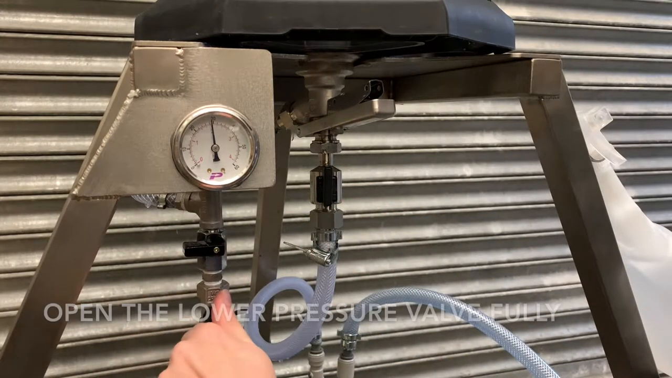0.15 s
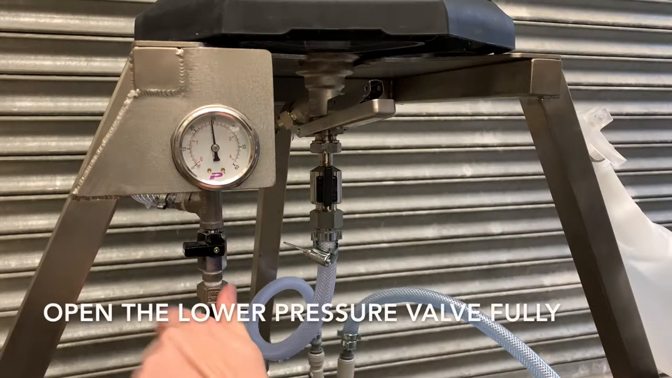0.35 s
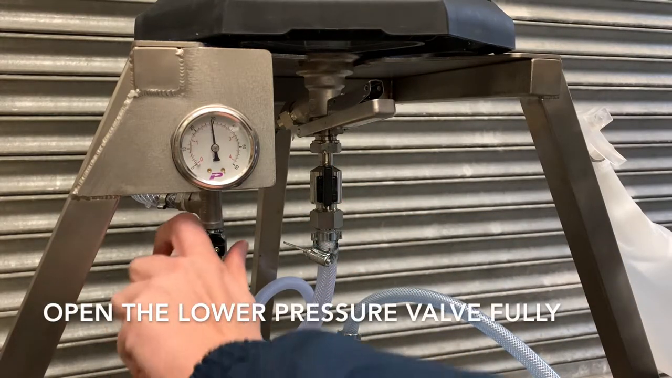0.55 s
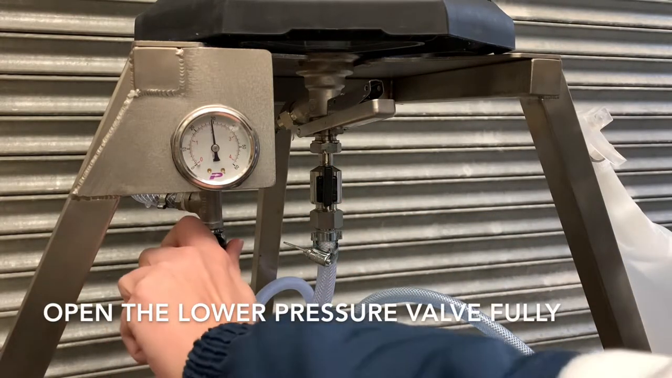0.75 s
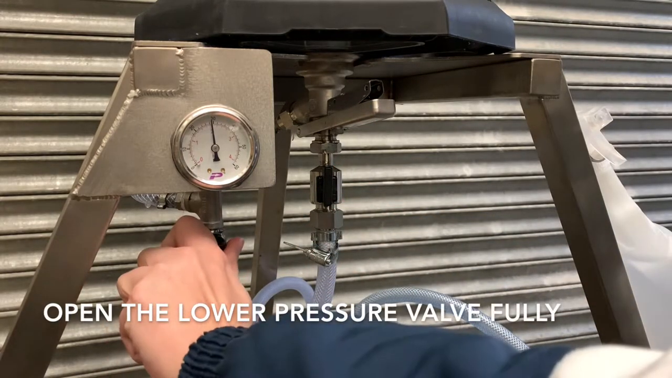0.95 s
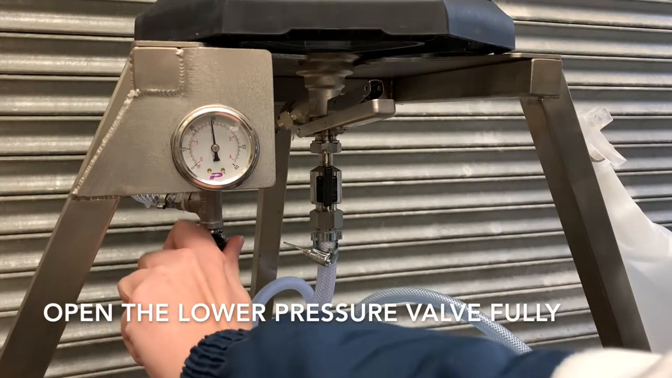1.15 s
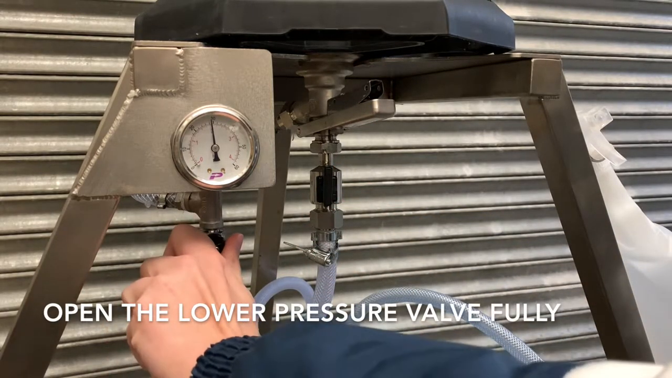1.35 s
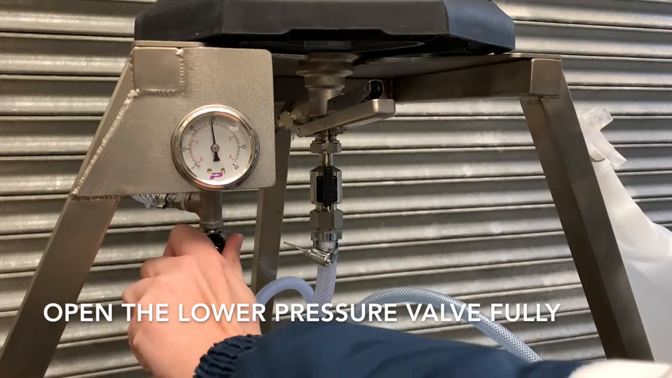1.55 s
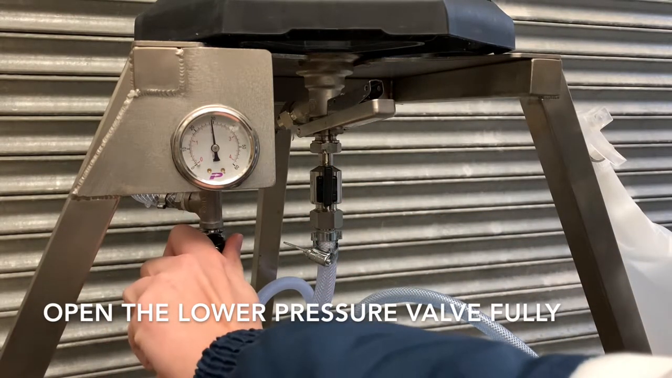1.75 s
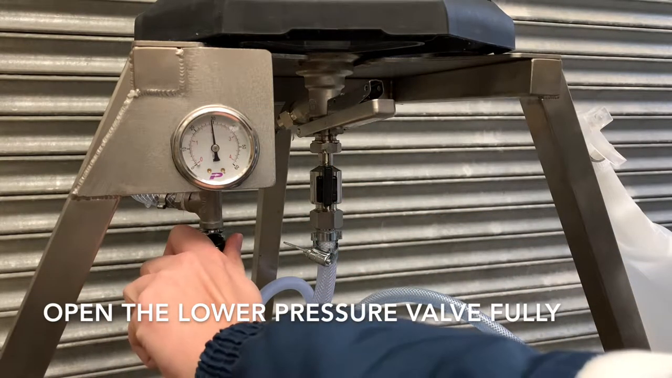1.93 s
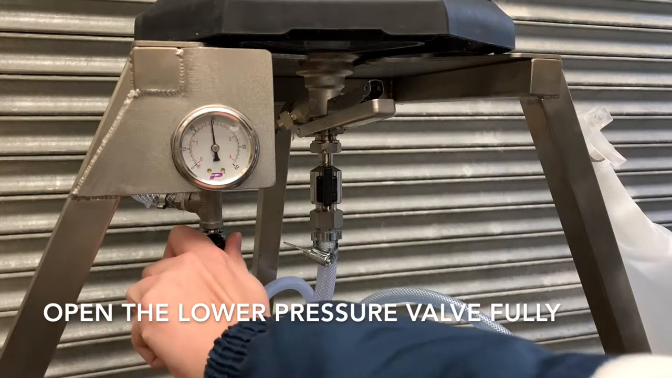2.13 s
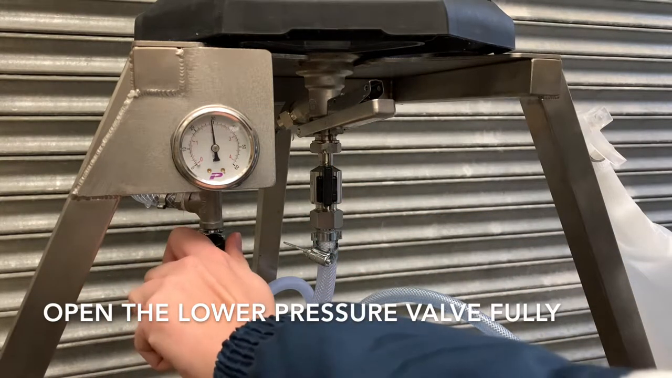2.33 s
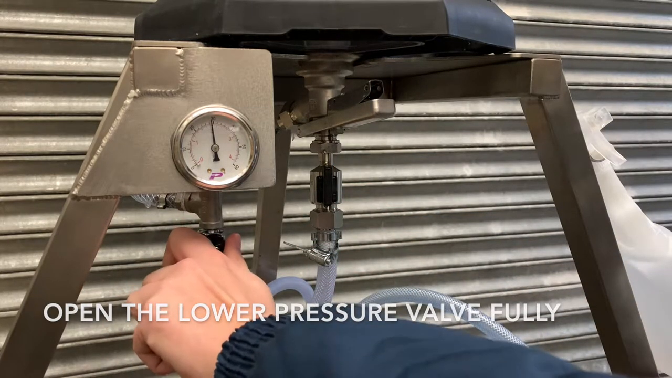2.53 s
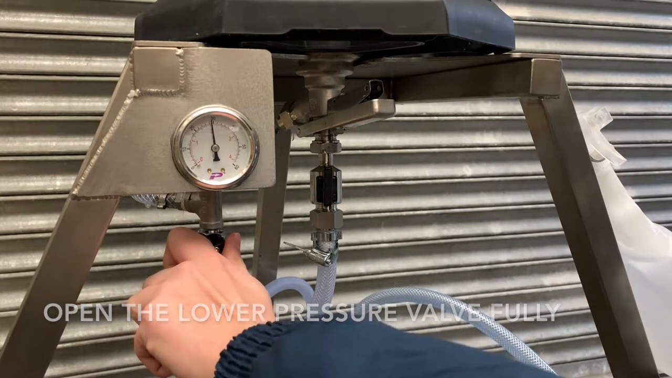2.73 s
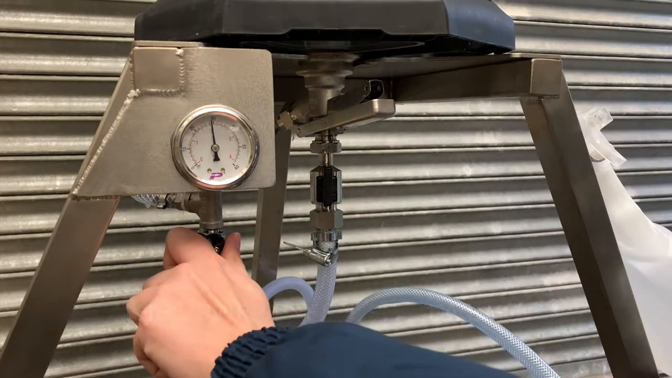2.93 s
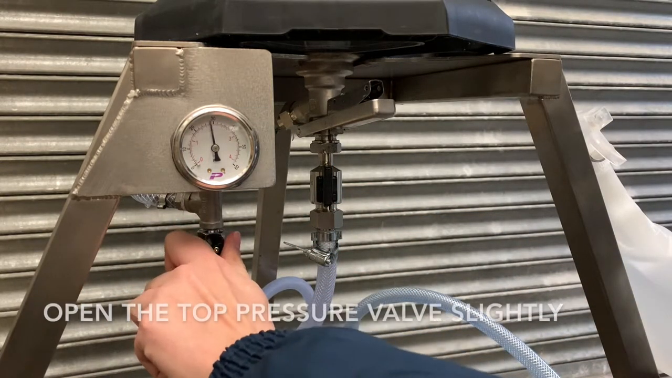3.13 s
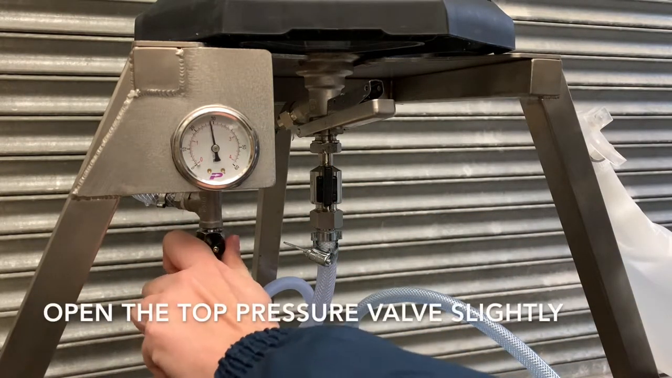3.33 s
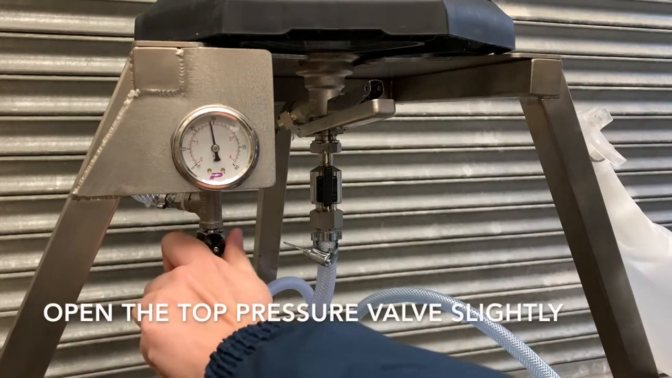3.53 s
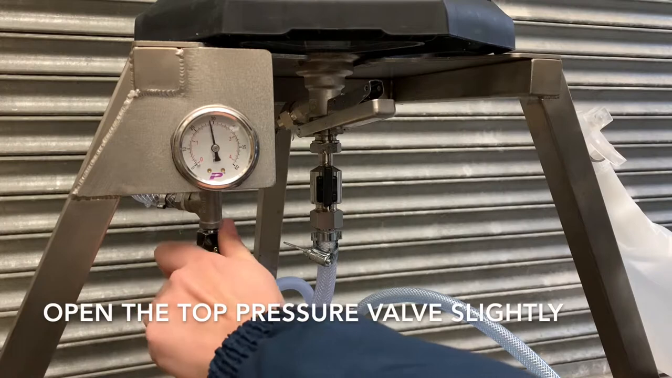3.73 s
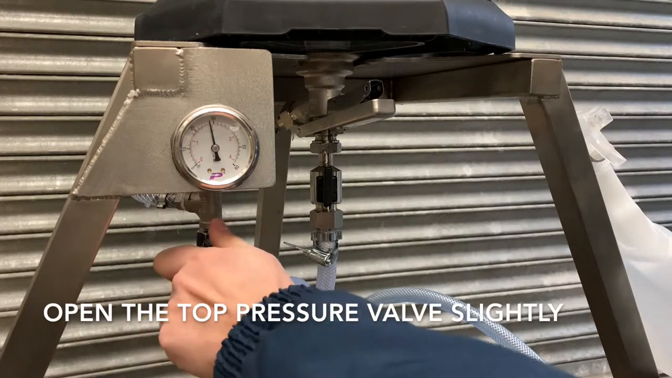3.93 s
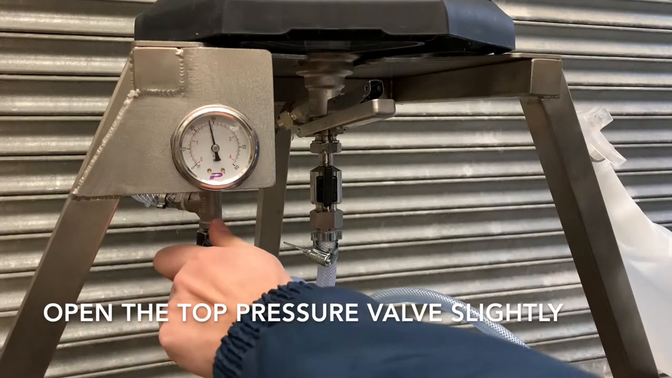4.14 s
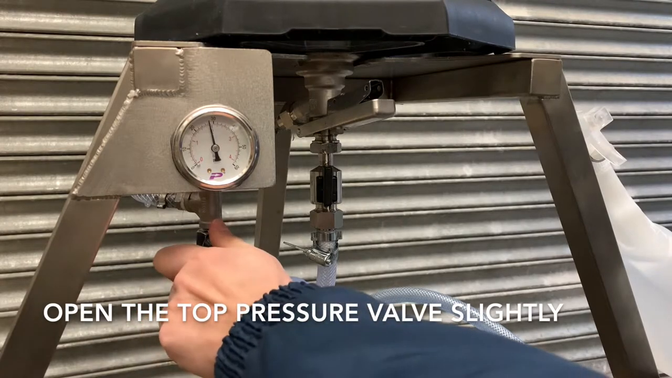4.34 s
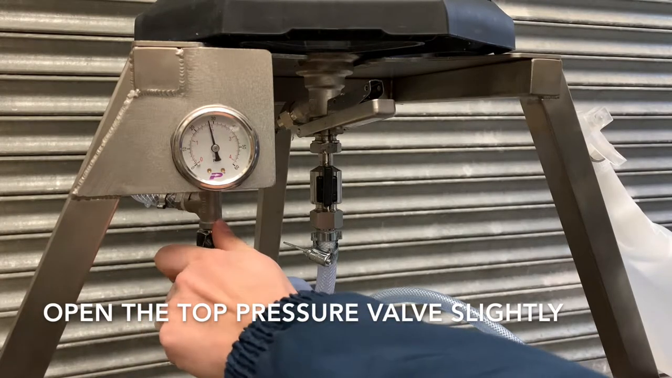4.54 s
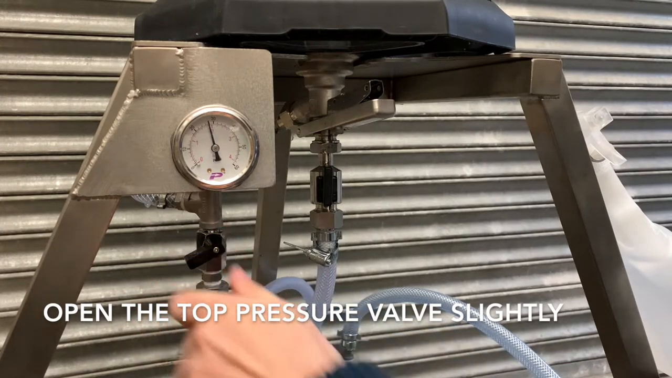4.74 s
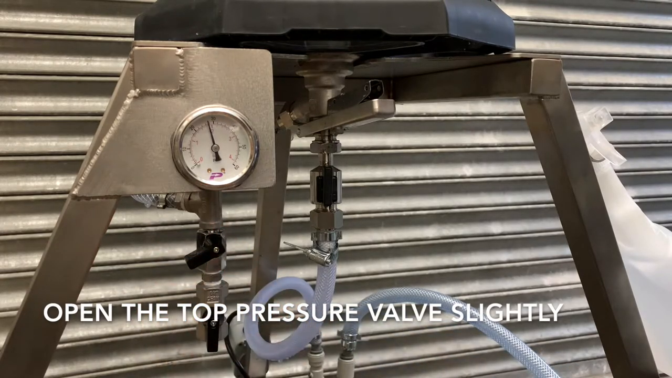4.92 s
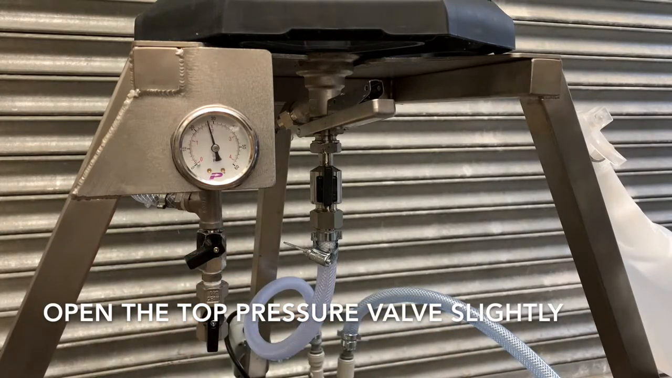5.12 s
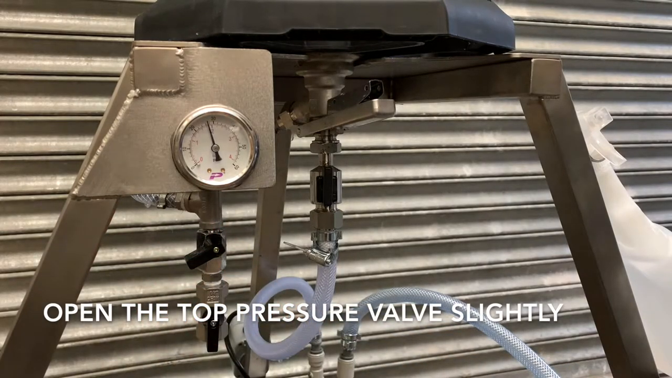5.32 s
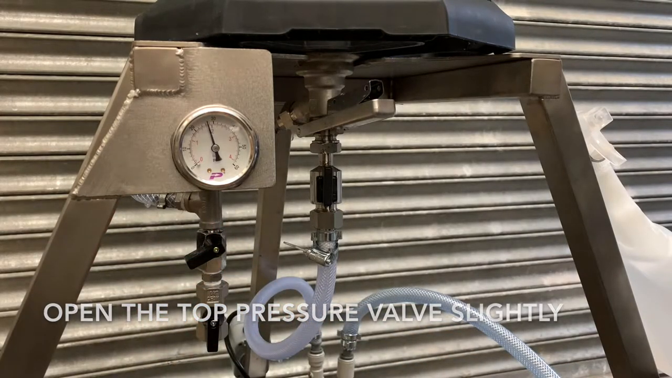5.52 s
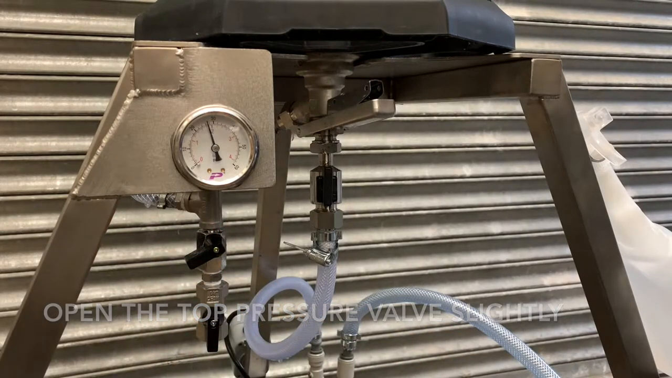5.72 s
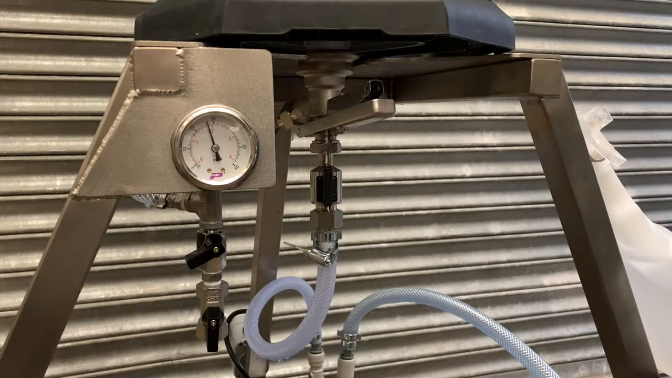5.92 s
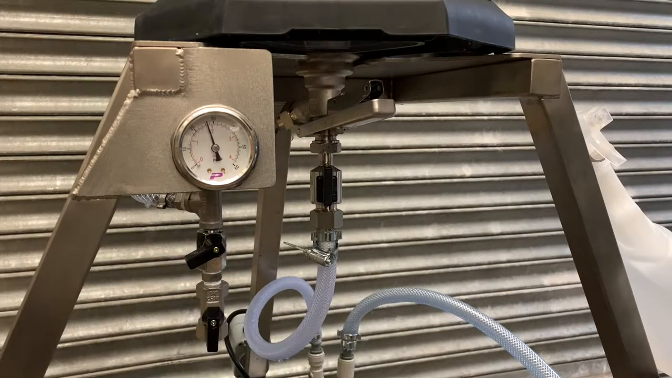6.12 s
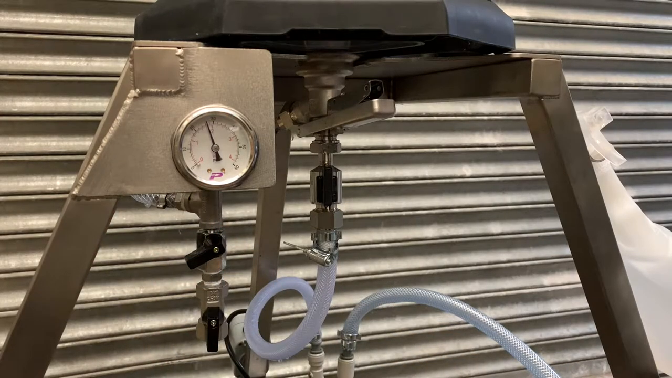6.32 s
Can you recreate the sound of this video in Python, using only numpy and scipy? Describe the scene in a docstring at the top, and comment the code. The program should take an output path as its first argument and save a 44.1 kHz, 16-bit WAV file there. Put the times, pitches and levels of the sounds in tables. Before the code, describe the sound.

Faint machine hum and a thin gas seep with small valve ticks, then a loud spluttering gas jet settles into steady bright hiss.

```python
"""A loud jet of gas vents from the top valve of a keg filling stand, indoors: a spluttering roar, then bright hiss.
Before it, gas seeps thinly through the lower valve, and the handle ticks twice; a machine hums in the room.
Gas is shaped noise ringing in pipework, with a fuzzy edge tone in the jet; the machine is a set of wavering sines.
The recorder's slow gain control turns everything down under the jet, so the hum sinks beneath the hiss."""
import sys
import numpy as np
from scipy import signal
from scipy.fft import rfft, irfft
from scipy.io import wavfile
from scipy.ndimage import uniform_filter1d

SR = 44100
rng = np.random.default_rng(int(sys.argv[2]) if len(sys.argv) > 2 else 0)


def dump_mix(stems):
    """Bounce the given channels to the path in sys.argv[1] as a 16-bit WAV at rate SR."""
    frames = np.atleast_2d(stems).T  # one column per channel
    limited = np.clip(frames, -1, 1)  # hard clip at full scale
    pcm = np.round(limited * 32767).astype(np.int16)
    wavfile.write(sys.argv[1], SR, pcm)


N = 285327
TIME, HZ = np.arange(N) / SR, np.fft.rfftfreq(N, 1 / SR)
JET_OPENS_S = 3.032

# How alike the gas noise is at the two microphones. Each row: frequency in Hz, left-right coherence (0-1).
HISS_LIKENESS = [(200, 0.76), (1000, 0.72), (2400, 0.84), (4000, 0.46), (5500, 0.49), (6800, 0.18),
                 (7400, 1), (15000, 1)]


def jet():
    """The top valve cracks open: low turbulence surges in spurts, then the flow settles into bright hiss."""
    # Flow through the top valve. Each row: time in seconds, level in dB.
    jet_flow = [(3.14, -16), (3.25, -12.5), (3.8, -10.5), (3.93, -10.5), (4.3, -10), (4.53, -11),
                (4.95, -8.5), (5.6, -7.5), (6.45, -7.5)]
    # Spurts before the jet settles. Each row: start, end, attack and release in seconds, strength (0-1).
    spurts = [(3.02, 3.247, 0.016, 0.061, 0.92), (3.4, 3.562, 0.071, 0.34, 0.82)]
    # Tone of the jet under its resonances. Each row: frequency in Hz, relative level in dB per Hz.
    jet_colour = [(60, -30), (200, -29), (450, -23.5), (800, -17.5), (1400, -7.5), (1750, -14), (2650, -13),
                  (3100, -7), (4500, -12.5), (7000, -3), (9000, 0.5), (11000, -6.5), (13000, -2.5),
                  (15700, -4)]
    # Resonances and notches of the pipe and hose. Each row: frequency in Hz, width in Hz, lift in dB.
    jet_modes = [(829.0, 150.0, 6.2), (1038.0, 108.0, 13.3), (1160.0, 127.0, 5.2), (1504.0, 67.0, 5.4),
                 (1620, 70, -4), (2169.0, 205.0, 3.6), (2670, 50, -6), (3587.0, 231.0, 11.8),
                 (3947.0, 301.0, 8.2), (4160, 90, -5), (4333.0, 136.0, 7.5), (4530, 70, -4),
                 (4711.0, 323.0, 7.3), (5084.0, 103.0, 5.8), (5310, 80, -7), (5566.0, 775.0, 3.0),
                 (5950, 130, -6)]
    # High, sharp resonances of the valve's seat. Each row: frequency in Hz, width in Hz, lift in dB.
    seat_modes = [(7268, 112, 14.9), (7431, 75, 6.4), (7580, 128, 10.7), (7758, 92, 10.0),
                  (8065, 134, 10.5), (8311, 165, 4.4), (8663, 74, 7.9), (8798, 113, 2.6), (9383, 108, 7.4),
                  (9553, 63, 6.9), (9746, 113, 10.2), (10144, 73, 6.6), (10515, 71, 6.6), (10850, 200, 4.9),
                  (11239, 103, 8.8), (11576, 119, 11.4), (11891, 76, 7.9), (12045, 120, 9.9),
                  (12313, 114, 13.3), (12556, 50, 5.0), (12752, 184, 6.9), (13365, 61, 7.0),
                  (13705, 59, 4.2), (13916, 74, 7.4), (14278, 82, 4.5), (14500, 90, 5.4), (14820, 165, 8.6),
                  (15250, 200, 6.3), (15556, 141, 7.6)]
    # Broad dull rush of the first spurts. Each row: frequency in Hz, relative level in dB per Hz.
    spurt_colour = [(60, -20), (200, -8.5), (350, -3.5), (650, -0.5), (1300, 1.5), (2300, 3.5),
                    (3200, -4.5), (5000, -4), (16000, -45)]
    attack_s = 0.047
    pop_at_s, pop_width_s, pop_db = 3.087, 0.017, 2
    roar_top_hz, rush_top_hz = 2390, 6450
    # each low part: its gain in the settled flow, and its lift per unit of surge
    roar_db, roar_lift_db = 0.5, 6
    rush_db, rush_lift_db = 1.43, 5.5
    spurt_db, spurt_lift_db = -29.5, 18  # grows faster than the ringing parts

    level_db, = curves(jet_flow)
    opening = np.clip((TIME - JET_OPENS_S) / attack_s, 0, 1) ** 2
    surge = sum(strength * envelope(*shape) for *shape, strength in spurts)
    splutter_db = flutter(rate_hz=36) * (0.58 + 0.5 * surge)  # a rougher flow while it roars

    # three bands of the same ringing gas
    gas_spectra = turbulence(jet_colour, jet_modes + seat_modes)
    low = below(roar_top_hz)
    low_and_middle = below(rush_top_hz, order=24)
    roar = irfft(gas_spectra * low, N)
    roar *= from_db(roar_db + roar_lift_db * surge + 1.53 * flutter(rate_hz=11))
    rush = irfft(gas_spectra * (low_and_middle - low), N)
    rush *= from_db(rush_db + rush_lift_db * surge + 0.74 * flutter(rate_hz=8.8))
    fizz = irfft(gas_spectra * (1 - low_and_middle), N)

    spurt = unit(irfft(noise_pair(HISS_LIKENESS) * from_db(spectrum(spurt_colour)), N))
    spurt *= from_db(spurt_db + spurt_lift_db * surge)

    # gas trapped behind the valve pops out first, heard in the treble and the edge tone
    pop = from_db(pop_db * np.exp(-((TIME - pop_at_s) / pop_width_s) ** 2))
    gas = roar + spurt + rush + pop * (fizz + edge_tone())
    return gas * from_db(level_db + splutter_db) * opening


def edge_tone():
    """The valve's gap whistles: a carrier blurred by slow noise, its pitch climbing and settling."""
    # Spells in which it sings out. Each row: start, end, attack and release in seconds, added level in dB.
    edge_spells = [(3.02, 3.1, .02, 0.19, -6.5), (4.615, 6.5, 0.25, .1, -13.5)]
    start_hz, end_hz, glide_s = 5200, 5600, .35
    rest_db = -15  # its level between the spells
    blur_hz = 407.8  # sets how fuzzy the whistle is

    hz = end_hz + (start_hz - end_hz) * np.exp(-np.maximum(TIME - JET_OPENS_S, 0) / glide_s)
    level = from_db(rest_db) + sum(from_db(db) * envelope(*shape) for *shape, db in edge_spells)
    noise = np.fft.fft(rng.standard_normal((2, N)) + 1j * rng.standard_normal((2, N)))
    shared, own = np.fft.ifft(noise / (1 + (np.fft.fftfreq(N, 1 / SR) / blur_hz) ** 2) ** 1.1)
    # louder on the right
    blur = np.array([0.42 * shared + 1.06 * own, shared]) * from_db([[-3.2], [3.2]])
    carrier = np.exp(2j * np.pi * np.cumsum(hz) / SR)
    return unit((blur * carrier).real) * level


def seep():
    """Thin hiss of gas through the lower valve, nearly choked once as the handle turns."""
    # Flow as the hand turns the valve. Each row: time in seconds, level in dB.
    seep_flow = [(1.55, -36), (2.15, -39), (2.55, -41.5), (2.9, -37), (3.0, -41.5)]
    # Spells in which gas gets through. Each row: opens in seconds, shuts in seconds.
    seep_spells = [(1.255, 1.624), (1.78, 3.06)]
    # Tone of the seep under its resonances. Each row: frequency in Hz, relative level in dB per Hz.
    seep_colour = [(500, -37), (2800, -15), (4300, -9.5), (6300, -12), (8500, -4.5), (10700, -14.5),
                   (12000, -8), (13600, -6.5), (15700, -1.5)]
    # Resonances of the valve and its fittings. Each row: frequency in Hz, width in Hz, lift in dB.
    seep_modes = [(2941, 219, 4), (3660, 200, 15), (3930, 300, 8), (4794, 127, 9), (5220, 270, 14),
                  (5530, 200, 12.5), (7320, 560, 14), (7769, 80, 10), (8086, 80, 10.5), (8550, 120, -5),
                  (9438, 900, 11), (11275, 94, 8), (11576, 80, 9), (12280, 650, 14), (12762, 80, 9),
                  (14838, 450, 7)]
    attack_s, release_s, leak_db = 0.026, .035, -16.5

    level_db, = curves(seep_flow)
    opening = sum(envelope(opens, shuts, attack_s, release_s) for opens, shuts in seep_spells)
    # the shut valve still leaks a little until the jet opens
    leak = from_db(leak_db) * envelope(seep_spells[0][0], JET_OPENS_S, attack_s, release_s)
    gas = irfft(turbulence(seep_colour, seep_modes), N)
    return gas * from_db(level_db + 0.62 * flutter(rate_hz=33)) * np.maximum(opening, leak)


def turbulence(colour, modes, echo_db=-5):
    """Spectra of gas noise ringing in pipework, combed by echoes off the steel around it."""
    # Stereo balance of the hiss. Each row: frequency in Hz, left minus right in dB.
    hiss_balance = [(200, -2), (700, -2), (1050, -2), (1400, 0), (2500, 1), (3600, -2.5), (4600, -1.5),
                    (5500, -10.5), (6500, 5.5), (7400, 0.5), (15000, -0.5)]
    treble_lag_s, wide_above_hz = 0.000215, 7150

    lift_db = sum(db / (1 + (2 * (HZ - hz) / width) ** 2) for hz, width, db in modes)
    delays_s = rng.uniform(.002, .03, size=24)
    echoes = sum(rng.choice([-1, 1]) * np.exp(-2j * np.pi * HZ * delay) for delay in delays_s)
    echoes = echoes / np.sqrt(len(delays_s))
    pair = noise_pair(HISS_LIKENESS) * from_db(spectrum(colour) + lift_db)
    pair *= 1 + from_db(echo_db) * echoes
    pair *= from_db(np.outer([.5, -.5], spectrum(hiss_balance)))
    # the treble reaches the left side a little late, which spreads it wide
    pair[0] *= np.exp(-2j * np.pi * HZ * treble_lag_s * (HZ > wide_above_hz))
    return pair / np.std(irfft(pair, N))


def ticks():
    """Each handle tick is a brief bright scrape of the valve's ball in its seat: decaying band noise."""
    # Each row: time in seconds, starting level in dB, centre frequency in Hz, decay in seconds.
    tick_rows = [(1.098, -62, 14000, .007), (1.818, -48, 11600, .007)]
    out = np.zeros((2, N))
    for s, db, hz, decay in tick_rows:
        scrape = unit(irfft(noise_pair(HISS_LIKENESS) / (1 + ((HZ - hz) / 1300) ** 2), N))
        out += scrape * from_db(db) * np.exp(-abs(TIME - s) / decay) * (TIME > s)
    return out


def background():
    """A machine drones and whines over the rumble of the room, all fading in."""
    fade_start_s, fade_s, trim_db = 0.6, 0.39, .5
    fade = np.clip((TIME - fade_start_s) / fade_s, 0, 1)
    right_lean = from_db([[-.9], [.9]])
    return (room_air() + machine()) * right_lean * from_db(trim_db) * fade


def machine():
    """The machine's low drone and mains hum stay nearly steady; its thin whine wavers more."""
    # Drone and mains hum. Each row: frequency in Hz, level in dB before the background trim.
    drone = [(66.7, -42), (100, -56.5)]
    # Thin whine. Each row: frequency in Hz, level in dB before the background trim.
    whine = [(325.7, -70.5), (651.4, -63), (834.4, -66.5), (976, -64.5), (1077, -60.5), (1125, -62),
             (1448, -67.5), (1628, -64.5), (1954, -65.5), (2279, -58), (2605, -60.5)]
    return tones(drone, waver_db=0.2, drift_rad=0.21) + tones(whine, waver_db=2.0, drift_rad=0.44)


def tones(lines, waver_db, drift_rad):
    """Sine lines that waver slightly in level and phase."""
    total = 0
    for hz, db in lines:
        level = np.sqrt(2) * from_db(db + waver_db * flutter(rate_hz=12.0))
        phase = 2 * np.pi * (hz * TIME + rng.random()) + drift_rad * flutter(rate_hz=6.9)
        total = total + level * np.sin(phase)
    return total


def room_air():
    """The air of the room is soft, rumbling noise, more alike on both sides in the bass."""
    # Tone of the room. Each row: frequency in Hz, relative level in dB per Hz.
    room_colour = [(20, -35), (45, -4), (65, 1), (90, -6.5), (135, -7), (250, -14.5), (450, -17.5),
                   (750, -20), (1060, -15.5), (1700, -23.5), (2500, -20.5), (3200, -29), (5200, -32.5),
                   (9000, -48), (16000, -64)]
    # Each row: frequency in Hz, left-right coherence (0-1).
    room_likeness = [(60, 0.79), (300, 0.61), (1500, 0.28), (8000, 0.27)]
    air = unit(irfft(noise_pair(room_likeness) * from_db(spectrum(room_colour)), N))
    return from_db(-45) * air


def noise_pair(likeness):
    """Spectra of white noise at two microphones that hear partly the same."""
    a, b = rfft(rng.standard_normal((2, N)))
    same = np.clip(spectrum(likeness), 0, 1)
    return np.array([a, same * a + np.sqrt(1 - same ** 2) * b])


def flutter(rate_hz):
    """Smooth random wandering of rms 1, up to about the given rate."""
    return unit(irfft(rfft(rng.standard_normal(N)) / (1 + (HZ / rate_hz) ** 2), N))


def envelope(start, end, attack, release):
    """Rises in a straight line, then dies away exponentially after the end; times in seconds."""
    return np.clip((TIME - start) / attack, 0, 1) * np.exp(-np.maximum(TIME - end, 0) / release)


def curves(rows):
    """Each column of a timed table, sample by sample."""
    s, *columns = np.transpose(rows)
    return [np.interp(TIME, s, column) for column in columns]


def spectrum(points):
    """Joins (Hz, value) points on a log-frequency axis."""
    hz, value = np.transpose(points)
    return np.interp(np.log(HZ + 1), np.log(hz + 1), value)


def below(edge_hz, order=10):
    """Gain of a smooth low-pass."""
    return 1 / (1 + (HZ / edge_hz) ** order)


def from_db(db):
    """Decibels to gain."""
    return 10 ** (np.asarray(db) / 20)


def unit(x):
    """Scales to an rms of 1."""
    return x / np.sqrt(np.mean(x ** 2) + 1e-20)


def scene():
    """Both valves, the handle, the machine and the room."""
    return jet() + seep() + ticks() + background()


def record(dry, threshold_db=-31, slope=0.61, settle_s=0.31):
    """Slow gain control eases the level down under the jet; then a low-pass limits the band."""
    power = uniform_filter1d((dry ** 2).mean(0), size=600)
    power_db = 10 * np.log10(abs(power) + 1e-12)
    wanted_cut_db = slope * np.maximum(power_db - threshold_db, 0)
    keep = np.exp(-1 / (settle_s * SR))
    cut_db = signal.lfilter([1 - keep], [1, -keep], wanted_cut_db)
    low_pass = signal.firwin(511, 15800, window=("kaiser", 9), fs=SR)  # edge in Hz
    return signal.oaconvolve(dry * from_db(-cut_db), low_pass[None], "same")


dry = scene()
out = record(dry)
dump_mix(out)
```